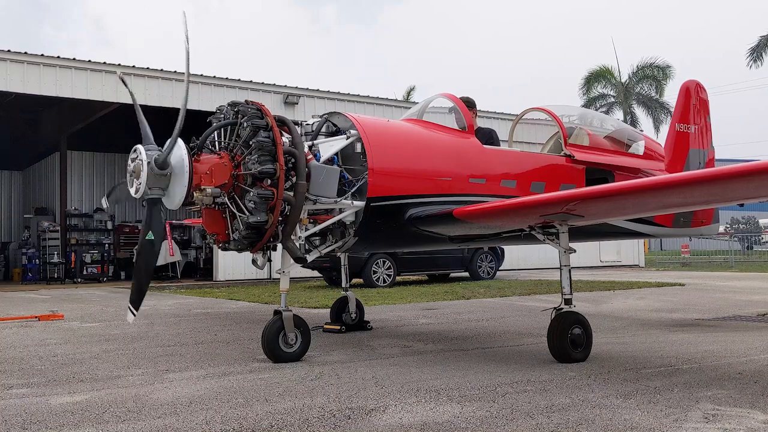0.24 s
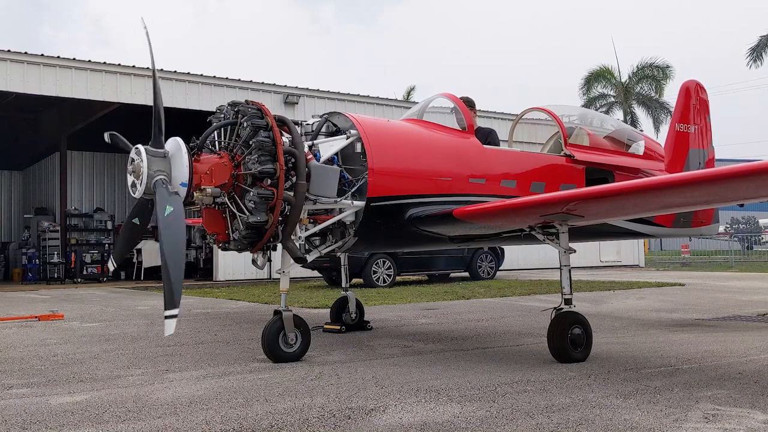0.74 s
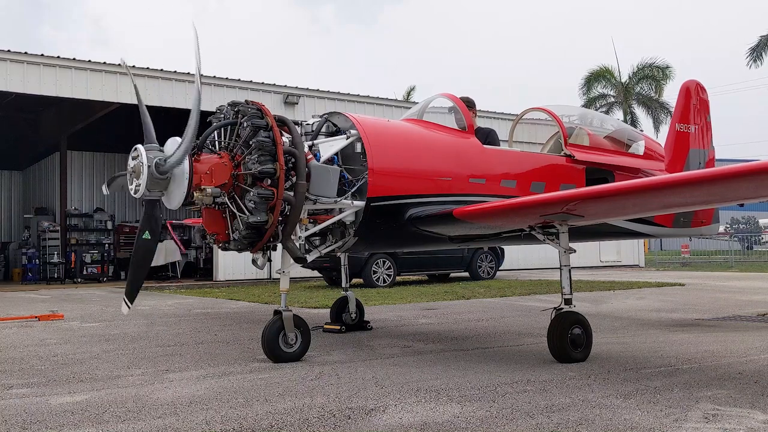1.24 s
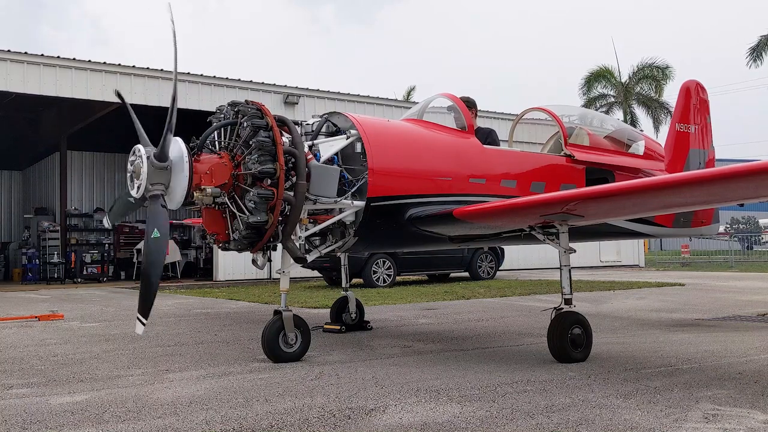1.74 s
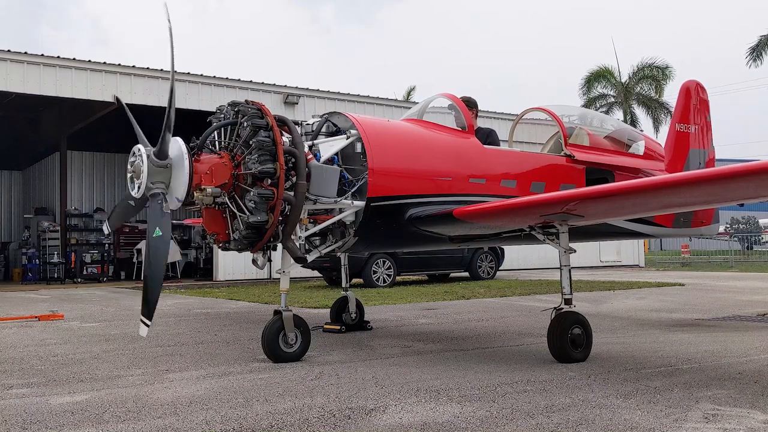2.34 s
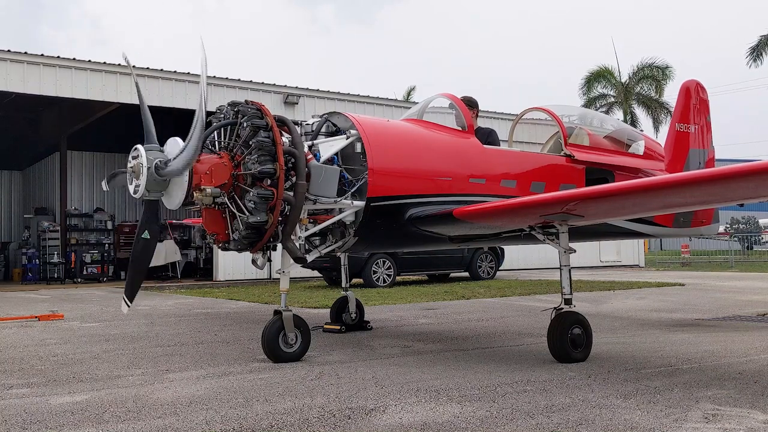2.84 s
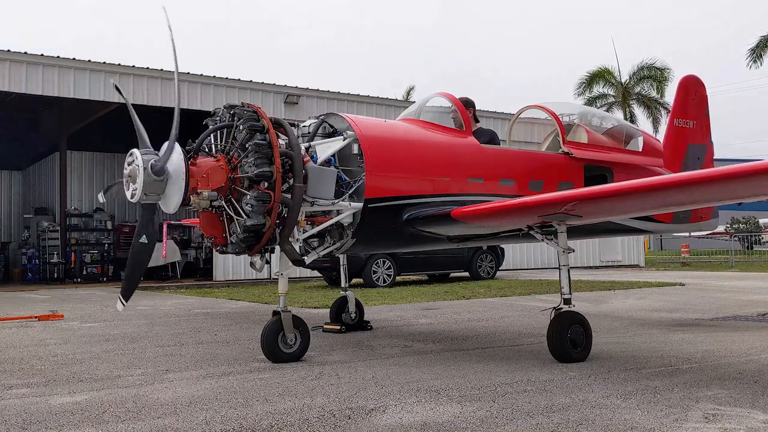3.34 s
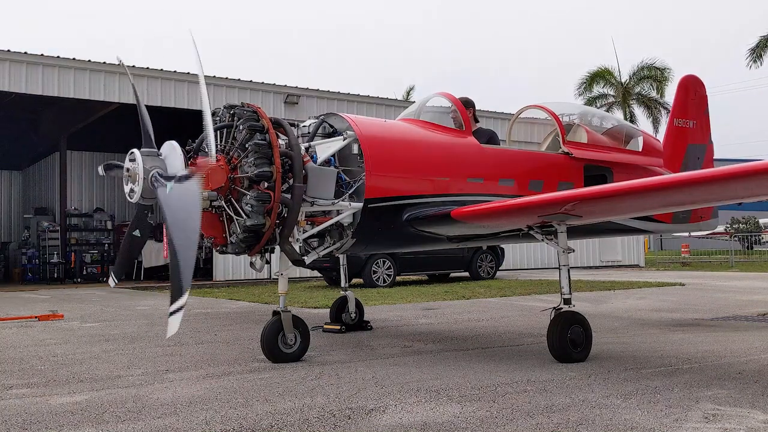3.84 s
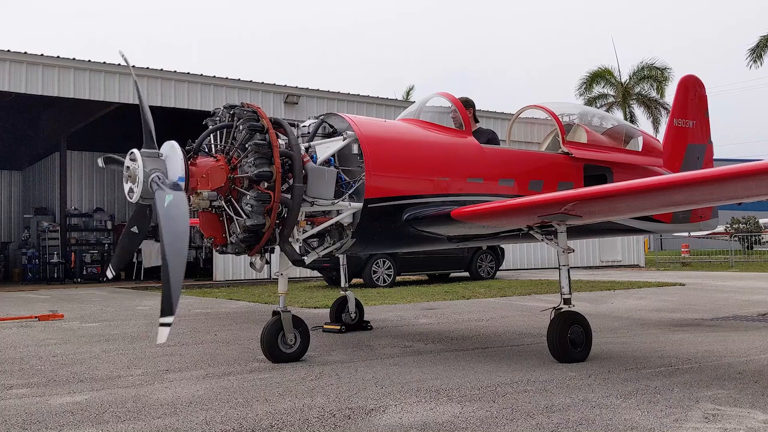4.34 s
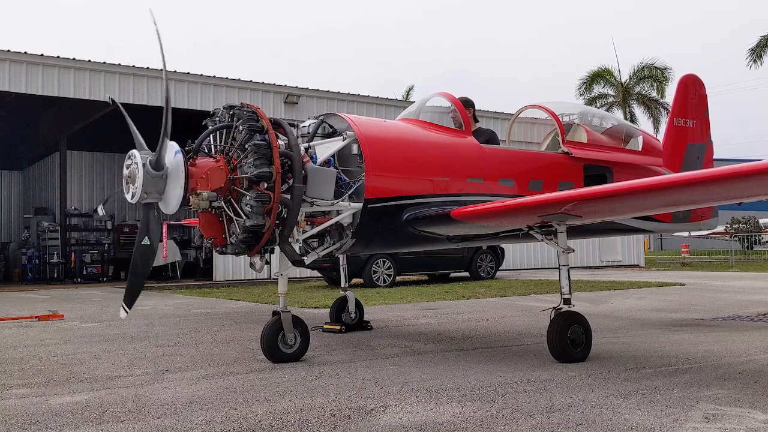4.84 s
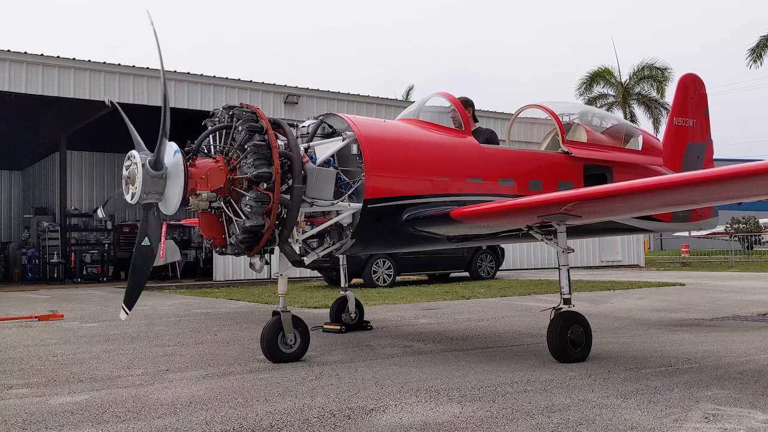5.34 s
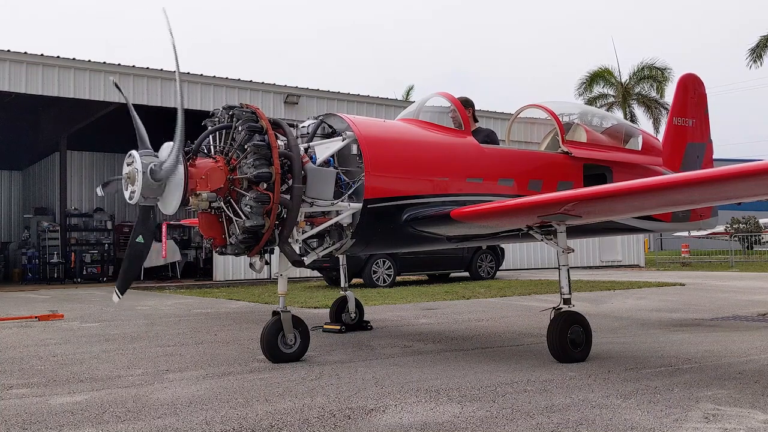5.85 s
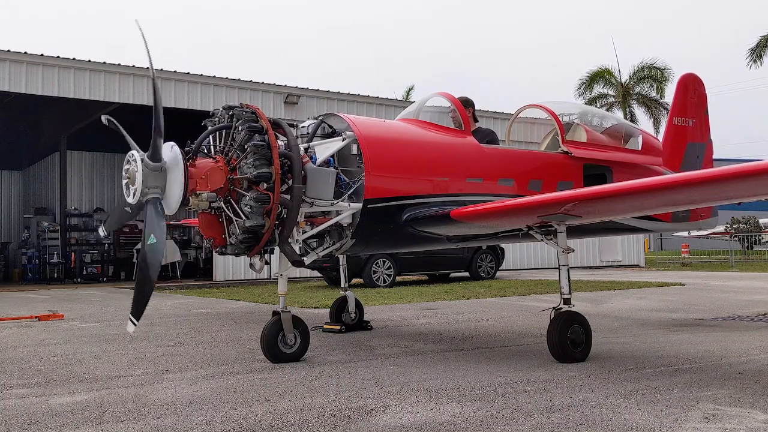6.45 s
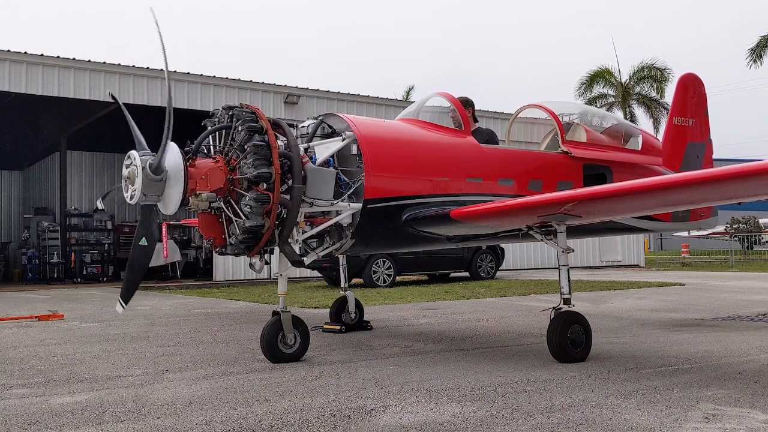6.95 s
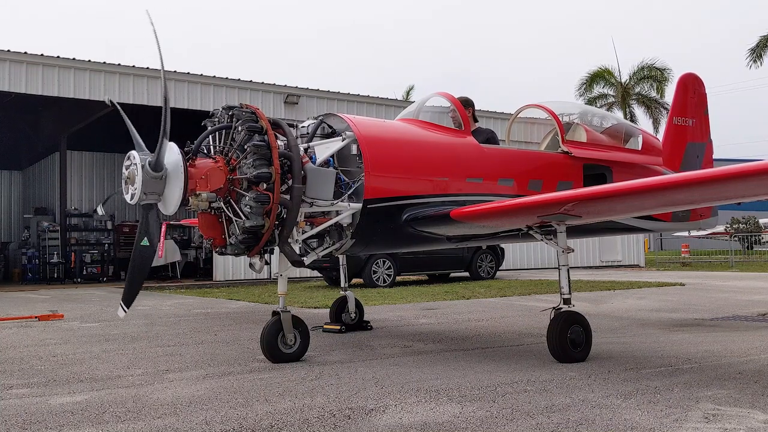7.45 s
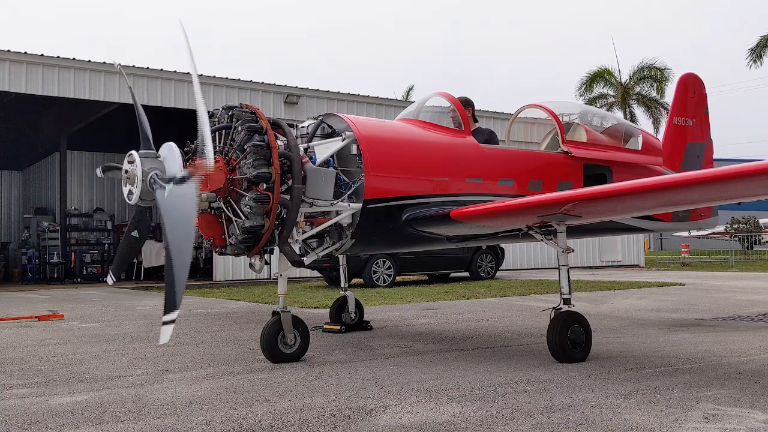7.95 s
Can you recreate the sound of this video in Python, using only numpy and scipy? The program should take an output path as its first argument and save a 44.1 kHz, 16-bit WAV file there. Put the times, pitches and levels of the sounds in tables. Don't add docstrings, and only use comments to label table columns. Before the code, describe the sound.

Close outdoors, a large piston aeroplane engine chugs unevenly for three seconds, then cuts to a faster, steadier, gradually quickening throb with softer rush.

```python
import sys
import numpy as np
from scipy import signal
from scipy.fft import rfft, irfft, next_fast_len
from scipy.io import wavfile
from scipy.ndimage import uniform_filter1d, map_coordinates

SR = 44100
rng = np.random.default_rng(int(sys.argv[2]) if len(sys.argv) > 2 else 0)


def magnitude_from_level(level_db):
    exponent = np.asarray(level_db, float) / 20
    return 10 ** exponent


def persist_wave(psi):
    counts = np.round(np.clip(psi, -1, 1) * 32767).astype(np.int16)
    wavfile.write(sys.argv[1], SR, np.atleast_2d(counts).T)


N = 361179
EARLY = 6000

# t/s, speed/(rev/min)
IDLE_SPEED = [
    (0, 591.1),
    (.326, 582.46),
    (1.134, 586.65),
    (1.765, 558.85),
    (2.131, 583.63),
    (2.455, 553.23),
    (3, 577),
]
FAST_SPEED = [
    (2.95, 770.84),
    (3.289, 770.36),
    (3.719, 777.06),
    (4.304, 801.91),
    (5.366, 823.57),
    (6.286, 829.71),
    (7.704, 848.6),
    (8.25, 862.9),
]
# blow-down strength/1, stack travel/ms, suction lag/ms, bark strength/1, bark delay/ms
IDLE_CYLINDERS = [(0.85, 3.07, 7.61, 0.54, 1.98), (1.63, 2.68, 5.03, 0.62, -2.87),
                  (2.04, 4.32, 4.43, 0.4, 2.63), (1.88, -4.03, 5.1, 1.16, -0.52),
                  (4.69, 6.7, 0.8, 1.27, 2.44), (2.0, 1.18, 11.96, 2.88, -5.05),
                  (1.46, -1.27, 6.0, 1.72, 4.97), (1.55, 6.55, 12.71, 1.09, 5.16),
                  (0.89, 0.75, 6.37, 0.92, -6.97), (0.95, -0.81, 8.48, 3.82, -3.87),
                  (0.64, -1.73, 5.7, 0.65, 5.27), (1.97, 8.85, 0.5, 1.99, 7.51),
                  (1.52, 0.7, 4.7, 2.25, -2.36), (1.73, 1.1, 5.84, 0.24, 4.67)]
FAST_CYLINDERS = [(1.6, -3.26, 10.35, 1.05, -3.3), (3.68, -3.41, 8.74, 1.23, 0.07),
                  (2.96, -0.67, 6.9, 2.58, -4.12), (1.1, 0.3, 0.86, 0.15, 4.74),
                  (2.8, -2.82, 9.44, 2.57, -2.89), (1.48, 0.79, 6.65, 2.31, -2.61),
                  (1.06, 0.58, 6.16, 0.31, 4.92)]
# f/Hz, width/Hz, signed gain/1
IDLE_COLLECTOR = [(59.5, 20.0, -0.089), (105.5, 47.6, 1.367), (106.7, 44.6, -1.36), (200.0, 68.1, -0.029)]
FAST_COLLECTOR = [(100.0, 20.0, 0.066), (186.0, 61.5, -0.261), (184.5, 47.9, 0.261), (40.0, 226.7, 0.013)]
# f/Hz, width/Hz, signed gain/1
IDLE_PORT = [(152.0, 57.9, 0.017)]
FAST_PORT = [(221.3, 20.0, 0.04)]
# share of four-stroke cycle at t = 0 /1, suction gain/1, wall echo gain/1, wall echo delay/ms
IDLE_PATH = (-.025, .84, -.13, 15.27)
FAST_PATH = (.231, .4, -.18, 38.63)
# share of firing pattern/1, level over steady rush cold/dB, warm/dB
IDLE_PUFFS = [
    (.09, 7, 3),
    (.2, 9.5, 9.5),
    (.3, 3, 2),
    (.415, 11, 4),
    (.475, 11.5, 12.5),
    (.635, 11.5, 12),
    (.76, 5, 4),
    (.92, -8, 8),
    (.025, 4, 5),
    (.855, 1, -8),
]
FAST_PUFFS = [
    (.1, -9, -3),
    (.19, -24, -2),
    (.46, -9, -2),
    (.55, -22, -5),
    (.65, -9, -2),
    (.95, -15, -2),
]
# share of cycle/1, level cold/dB, level warm/dB
HUFFS = [
    (.995, 13, 12),
    (.07, 10, 9),
    (.165, 11, 11),
    (.3, 7, 6),
    (.575, 10, 10),
    (.72, 7, 9),
    (.9, 0, 9),
]
# rush/dB, rush slope/(dB per 100 rev/min), bass left-right/dB, its slope/(same), exhaust/dB
IDLE_LEVELS = (-24.5, -0.9, 8, 1, 1)
FAST_LEVELS = (-27.5, 3, 9, -5, -0.14)
# f/Hz, level/dB (per Hz)
IDLE_RUSH = [(410, -17), (700, -3.5), (827, -9), (1440, -5), (1610, -10.5), (2250, -2.5), (3100, -8.5),
             (3850, -5), (5960, -9.5), (7040, -9.5), (9450, -6.5), (10600, -12.5), (11500, -7.5),
             (15000, -21)]
FAST_RUSH = [(390, -4), (660, -20), (880, -7.5), (1300, -5.5), (1630, -10.5), (2340, -7), (3290, -9),
             (4630, -10), (6410, -14.5), (9490, -12.5), (10500, -14.5), (11500, -11.5), (13500, -15.5),
             (15000, -30)]
# f/Hz, level/dB (per Hz)
IDLE_ROAR = [(30, -43), (100, -33), (200, -1), (350, -4), (480, -8.5), (800, -18), (1200, -28.5)]
FAST_ROAR = [(30, -75), (60, -49), (100, -53), (200, 1), (350, 11), (570, 11.5), (800, 7.5), (1200, -15)]
# f/Hz, width/Hz, level/dB
COWL = [(2570, 86, 0.5), (3970, 170, 1.5), (4610, 140, 3.5), (7040, 220, 5)]
# f/Hz, level/dB
MOUTH = [(20, -38), (40, -3), (60, 0), (150, 0.5), (300, 6), (450, 5.5), (620, 7), (750, -23.5), (1200, 11)]
# start t/s, end t/s, f/Hz, width/Hz, level/dB
WHISTLE = [
    (-.1, 1.12, 12403, 18, -41),
    (1.2, 1.6, 11550, 50, -39),
    (.1, 1.2, 11550, 300, -47),
    (1.2, 2, 11260, 130, -43),
    (1.85, 2.99, 11160, 110, -42),
    (6.8, 8.3, 11200, 130, -46),
]
# f/Hz, coherence/1
ALIKE = [(100, 0.2), (500, 1), (1000, 0.94), (2000, 0.86), (4000, 0.39), (8000, 0.044), (15000, 0.1)]
# f/Hz, phase/rad
LEAD = [(60, -.1), (95, -.2), (150, -.5), (260, -.45), (1000, .1), (7060, .7), (9300, 1.9), (15600, 10.4)]
# f/Hz, level/dB
LEAN = [(110, -18), (200, -2), (380, 1.5), (700, -1.5), (1290, 5), (2380, .3), (6000, 3), (15000, -2.5)]
# t/s, length/samples
REPEATS = [
    (4.58662, 118),
    (5.58662, 117),
    (6.58662, 118),
]
IDLE_RAPS = [(.0173, .15), (.0889, .85), (.17, 1.15), (.2285, .95), (.3176, 1.45), (.396, 1.05),
             (.4706, 1.4), (.5583, .9), (.6249, 1.85), (.6405, 1.8), (.6504, .6), (.819, 1.0), (.8973, .55),
             (.936, .5)]
FAST_RAPS = [
    (.1634, 1.04),
    (.3265, 1.3),
    (.4204, .38),
    (.455, .56),
    (.6654, .38),
    (.7564, 1.86),
    (.8454, 1.8),
    (.9141, 1.17),
    (1.0596, .52),
]
# f/Hz, width/Hz, signed gain/1
IDLE_STACK = [(120, 222, .0191), (137.3, 30, .022), (220.3, 30, -.034), (294, 77.6, -.024), (390, 40, .005)]
FAST_STACK = [(286, 30, -.026), (386.3, 30, .0175), (477, 49, -.0097), (563.9, 40, .0072),
              (620, 40, -.0045)]
# collector takes over below f/Hz, stacks silent above f/Hz, head start/ms
IDLE_REACH = (130, 470, 0)
FAST_REACH = (268, 690, 27.18)


def unit(x):
    return x / np.sqrt(np.mean(x ** 2) + 1e-20)


def along(points, hz):
    f, v = np.transpose(points)
    return np.interp(np.log(hz + 1), np.log(f + 1), v)


def crank_speed(rpm):
    s, speed = np.transpose(rpm)
    return np.interp(np.arange(N) / SR, s, speed)


def four_stroke_cycle(rpm, start):
    return start + np.cumsum(crank_speed(rpm)) / SR / 120


def moments(cycle, shares):
    before = np.minimum(shares - cycle[0], 0) / (cycle[1] - cycle[0]) / SR
    return np.interp(shares, cycle, np.arange(N) / SR, right=N) + before


def spikes(seconds, sizes):
    at = np.clip(seconds * SR + EARLY, 0, N + EARLY)
    whole = at.astype(int)
    part = at - whole
    out = np.bincount(whole, sizes * (1 - part), N + EARLY + 2)
    out = out + np.bincount(whole + 1, sizes * part, N + EARLY + 2)
    return out[2:N + EARLY]


def filtered(x, response):
    m = next_fast_len(N + SR // 2)
    return irfft(rfft(x, m) * response(np.fft.rfftfreq(m, 1 / SR)), m)[..., :N]


def resonance(f, modes):
    return sum(g * 1j * f * w / (c * c - f * f + 1j * f * w) for c, w, g in modes)


def lead(f):
    return np.exp(np.array([[1j], [-1j]]) * along(LEAD, f) / 2)


def exhaust(cycle, cylinders, pipe, port, path, scatter_db, jitter_ms):
    _, suction_gain, wall_gain, wall_ms = path
    firing = np.arange(-14, 14 * int(cycle[-1] + 1))
    size, travel, lag, bark, bark_ms = np.array(cylinders)[firing % len(cylinders)].T
    chance = rng.standard_normal((len(firing), 2))
    burn = magnitude_from_level(scatter_db * chance[:, 0]) * SR / 100
    s = moments(cycle, firing / 14) + jitter_ms * chance[:, 1] / 1000
    pulses = spikes(s + travel / 1000, burn * size)
    pulses = pulses - suction_gain * spikes(s + (travel + lag) / 1000, burn * size)
    barks = spikes(s + bark_ms / 1000, burn * bark)

    def ring(f, modes):
        skip_early = np.exp(2j * np.pi * f * EARLY / SR)
        return resonance(f, modes) * magnitude_from_level(along(MOUTH, f)) * skip_early

    wall = lambda f: 1 + wall_gain * np.exp(-2j * np.pi * f * wall_ms / 1000)
    collector = filtered(pulses, lambda f: ring(f, pipe) * wall(f))
    return collector + filtered(barks, lambda f: ring(f, port))


def raps(rpm, start, repeats, table, stack, reach, level_db, gain_db, scatter_db, jitter_ms):
    low_hz, high_hz, early_ms = reach
    speed = crank_speed(rpm)
    pattern = repeats * four_stroke_cycle(rpm, start)
    share, size = np.transpose(table)
    turns = np.arange(int(pattern[-1]) + 2)[:, None]
    chance = rng.standard_normal((len(turns), len(share), 2))
    s = moments(pattern, turns + share) + (jitter_ms * chance[..., 0] - early_ms) / 1000
    strength = size * magnitude_from_level(scatter_db * chance[..., 1]) * SR / 100
    blows = spikes(s.ravel(), strength.ravel())[EARLY:]
    band = lambda f: 1 / (1 + (low_hz / (f + 1)) ** 16) / (1 + (f / high_hz) ** 16)
    rung = filtered(blows, lambda f: band(f) * resonance(f, stack))
    return magnitude_from_level(level_db + gain_db * (speed - speed[0]) / 100) * rung


def puffing(pattern, puffs, scatter_db, rise_ms, fall_ms):
    share, cold_db, warm_db = np.transpose(puffs)
    turns = np.arange(int(pattern[-1]) + 1)[:, None]
    warm = np.clip((turns - 8) / 4, 0, 1)
    chance_db = scatter_db * rng.standard_normal((len(turns), len(share)))
    size = magnitude_from_level(cold_db + warm * (warm_db - cold_db) + chance_db)
    t = np.arange(SR // 20) / SR * 1000
    shape = (1 - np.exp(-t / rise_ms)) * np.exp(-t / fall_ms)
    start = moments(pattern, (turns + share).ravel()) - rise_ms / 1000
    power = spikes(start, size.ravel() ** 2)
    swell = signal.fftconvolve(power, (shape / shape.max()) ** 2)[EARLY:][:N]
    return np.sqrt(1 + np.abs(swell))


def noise(response, patchy_db):
    z = signal.stft(rng.standard_normal((2, N)), nperseg=128)[2]
    field = uniform_filter1d(rng.standard_normal(z.shape[1:]), size=3, axis=0)
    field = uniform_filter1d(field, size=5, axis=1)
    pair = signal.istft(z * magnitude_from_level(patchy_db * unit(field)), nperseg=128)[1][:, :N]

    def spread(hz):
        turn = np.arccos(np.clip(along(ALIKE, hz), -1, 1)) / 2
        return response(hz) * [np.cos(turn), np.sin(turn)]

    mid, side = filtered(pair, spread)
    lean = lambda hz: magnitude_from_level(np.array([[1], [-1]]) * along(LEAN, hz) / 2)
    return unit(filtered(np.array([mid + side, mid - side]), lambda hz: lean(hz) * lead(hz)))


def engine(rpm, levels, cylinders, pipe, port, path, puffs, rush, roar, roar_db, scatter_db, jitter_ms,
           spit_db, patchy_db, rise_ms, fall_ms, top_hz, upper):
    rush_db, rush_slope, pan_db, pan_slope, exhaust_db = levels
    cycle = four_stroke_cycle(rpm, path[0])
    gained = (crank_speed(rpm) - rpm[0][1]) / 100
    beat = magnitude_from_level(exhaust_db) * exhaust(cycle, cylinders, pipe, port, path, scatter_db, jitter_ms)
    beat = filtered(beat, lambda hz: 1 / (1 + (hz / top_hz / 1.06) ** 16)) + upper
    drone = filtered(beat, lambda hz: np.exp(-((hz - 218) / 15) ** 2))
    beat = beat - .27 * np.tanh(np.maximum(gained, 0) / .3) * drone
    bass = filtered(beat, lambda hz: 1 / (1 + (hz / 190) ** 4))
    lean = np.tanh((pan_db + pan_slope * gained) * np.log(10) / 58) * bass
    near = filtered(beat + lean * [[1], [-1]], lead)

    gate = puffing(cycle * 14 / len(cylinders), puffs, spit_db, rise_ms, fall_ms)
    rings = lambda hz: sum(db / (1 + (2 * (hz - c) / w) ** 2) for c, w, db in COWL)
    flow = noise(lambda hz: magnitude_from_level(along(rush, np.minimum(hz, 13800)) + rings(hz)), patchy_db)
    body = filtered(flow, lambda hz: 1 / (1 + (hz / 2000) ** 2))
    linger = uniform_filter1d(gate, size=SR // 70)
    gas = unit(gate * (flow - body) + linger * body)
    rumble = unit(linger * noise(lambda hz: magnitude_from_level(along(roar, hz)), 0.46))
    return near + magnitude_from_level(rush_db + rush_slope * gained) * gas + magnitude_from_level(roar_db) * rumble


def huff():
    cycle = four_stroke_cycle(IDLE_SPEED, IDLE_PATH[0])
    gate = puffing(cycle, HUFFS, scatter_db=1.5, rise_ms=3, fall_ms=14) - .6
    hollow = noise(lambda hz: 1 / (1 + ((hz - 590) / 120) ** 2), patchy_db=.5)
    return magnitude_from_level(-35) * unit(gate * hollow)


def wobble(rate):
    knots = rng.standard_normal(int(N * rate / SR) + 4)
    return map_coordinates(knots, [np.arange(N) * rate / SR])


def whistle():
    t, out = np.arange(N) / SR, np.zeros((2, N))
    for start, end, hz, width, db in WHISTLE:
        band = lambda f: 1 / (1 + (2 * (f - hz) / width) ** 2)
        tone = unit(filtered(rng.standard_normal(N), band))
        on = np.clip(np.minimum(t - start + .05, end - t) / 0.049, 0, 1)
        out += magnitude_from_level(db + 1.5 * wobble(20)) * on * tone * magnitude_from_level([[-1.5], [1.5]])
    return out


def scene():
    idle_raps = raps(IDLE_SPEED, IDLE_PATH[0], 0.99, IDLE_RAPS, IDLE_STACK, IDLE_REACH,
                     level_db=2.2, gain_db=1.1, scatter_db=.9, jitter_ms=.12)
    fast_raps = raps(FAST_SPEED, FAST_PATH[0], 2, FAST_RAPS, FAST_STACK, FAST_REACH,
                     level_db=-1.05, gain_db=3.5, scatter_db=.7, jitter_ms=.04)
    idle = engine(IDLE_SPEED, IDLE_LEVELS, IDLE_CYLINDERS, IDLE_COLLECTOR, IDLE_PORT, IDLE_PATH, IDLE_PUFFS,
                  IDLE_RUSH, IDLE_ROAR, roar_db=-30, scatter_db=1.2, jitter_ms=.25, spit_db=1.2,
                  patchy_db=3, rise_ms=3.5, fall_ms=5.5, top_hz=IDLE_REACH[0], upper=idle_raps)
    fast = engine(FAST_SPEED, FAST_LEVELS, FAST_CYLINDERS, FAST_COLLECTOR, FAST_PORT, FAST_PATH, FAST_PUFFS,
                  FAST_RUSH, FAST_ROAR, roar_db=-35, scatter_db=0.4, jitter_ms=0.07, spit_db=2.0,
                  patchy_db=1.72, rise_ms=1.3, fall_ms=12, top_hz=FAST_REACH[0], upper=fast_raps)
    idle = idle + huff()
    fade = np.interp(np.arange(N) / SR, (2.972, 2.992), [0, np.pi / 2])
    return idle * np.cos(fade) + fast * np.sin(fade) + whistle()


def low_pass(x):
    return signal.sosfilt(signal.butter(12, 16620, fs=SR, output="sos"), x)


def record(dry):
    now = np.arange(N)
    back = sum(count * (now >= s * SR) for s, count in REPEATS)
    kept = filtered(dry[:, now - back], lambda hz: hz < 16030)
    mix = kept / (1 + np.abs(kept / .85) ** 4) ** (1 / 4)
    return low_pass(mix)


dry = scene()
out = record(dry)
persist_wave(out)
```